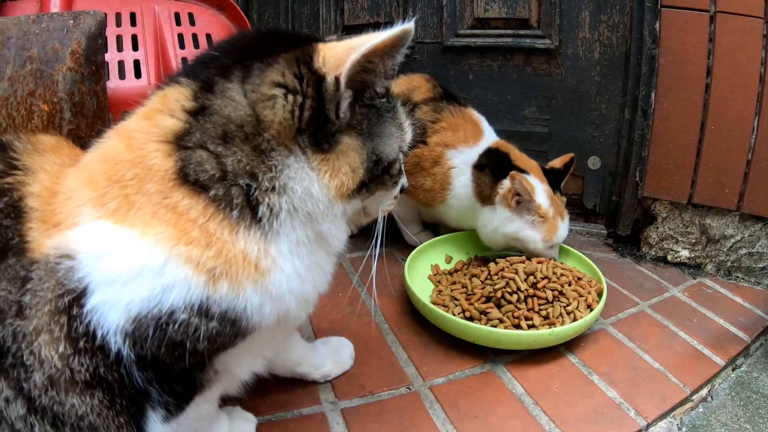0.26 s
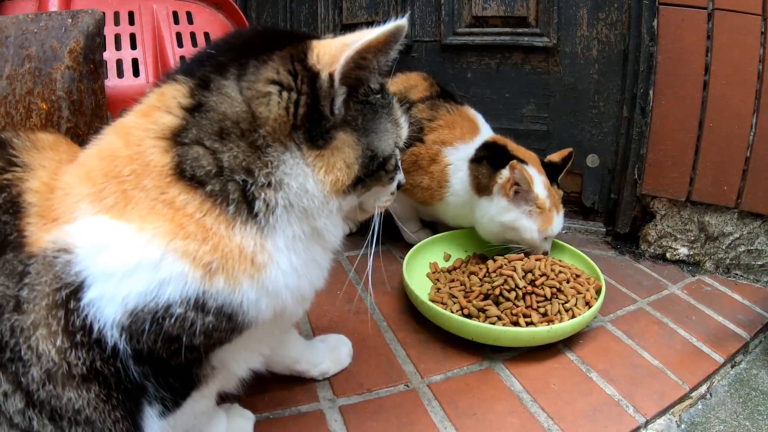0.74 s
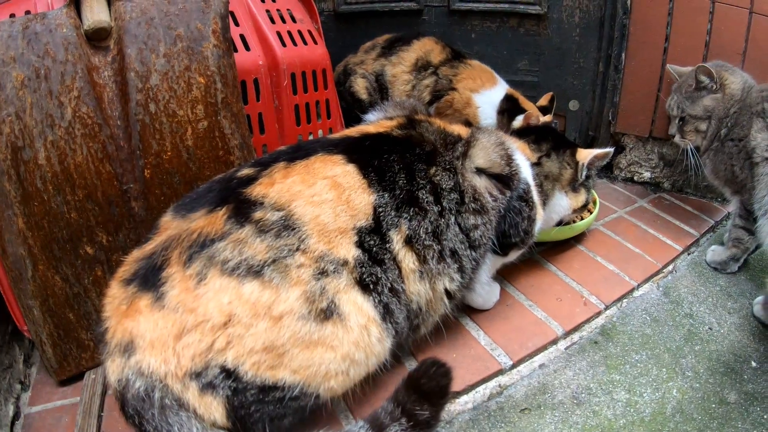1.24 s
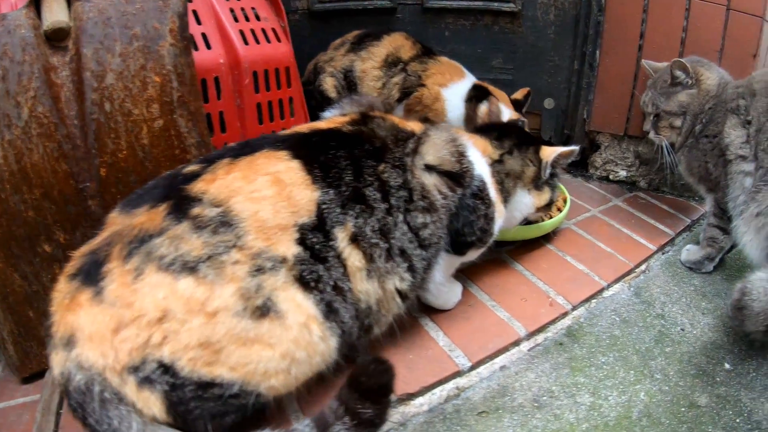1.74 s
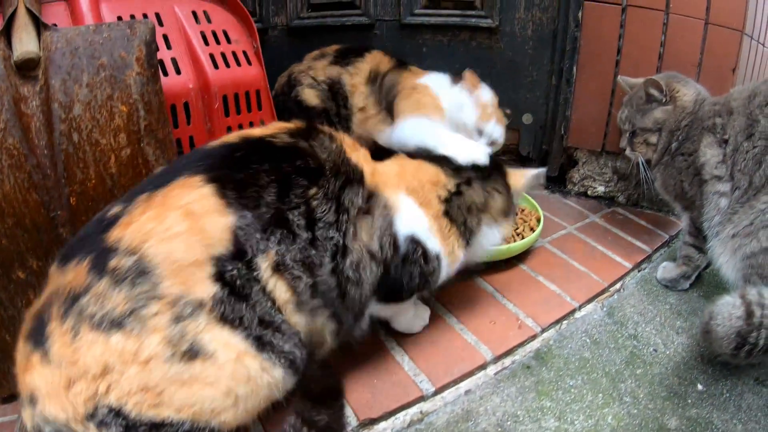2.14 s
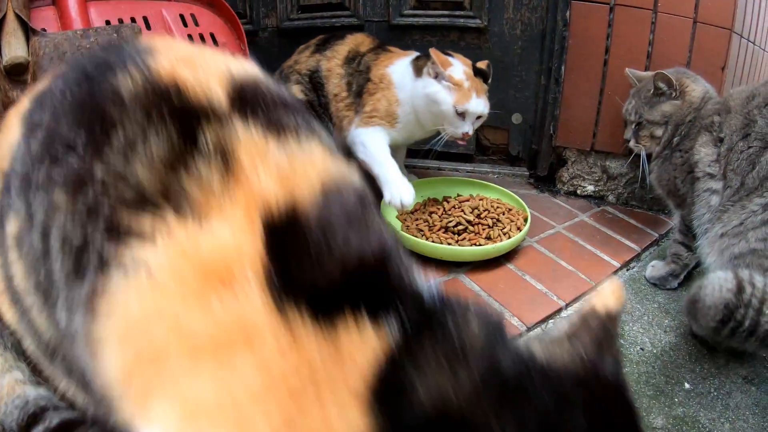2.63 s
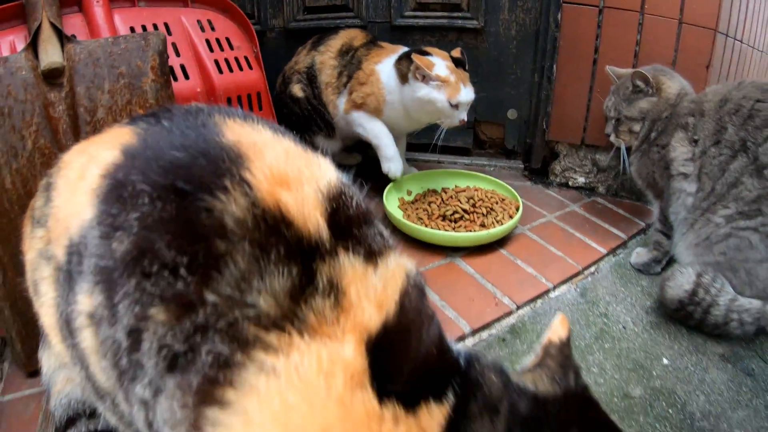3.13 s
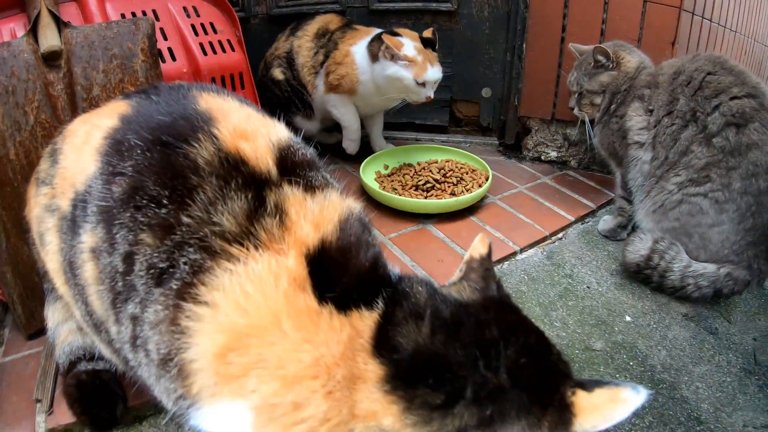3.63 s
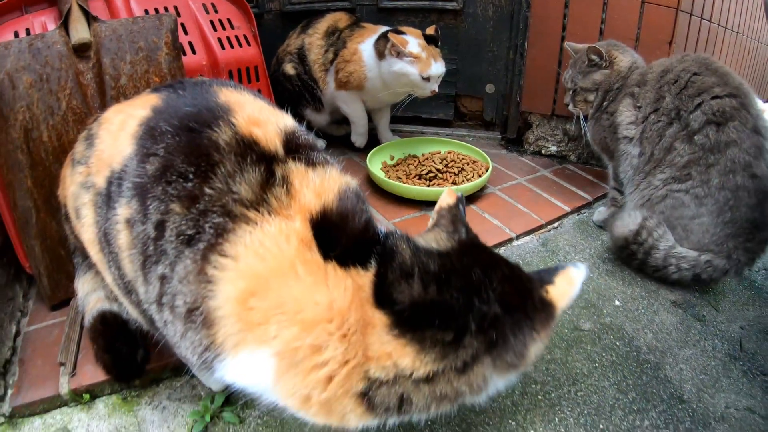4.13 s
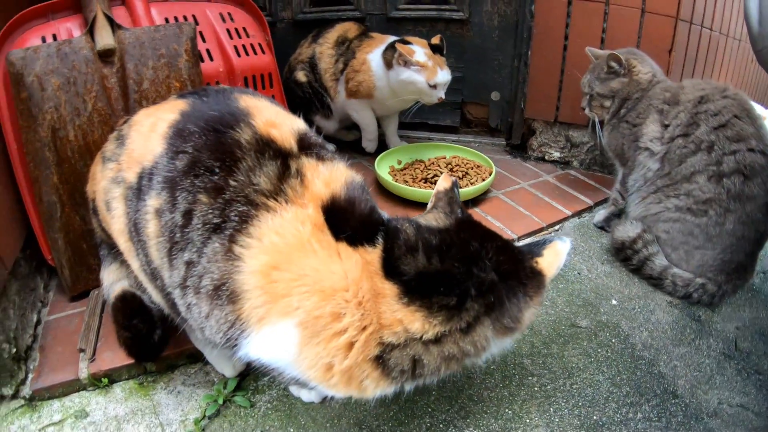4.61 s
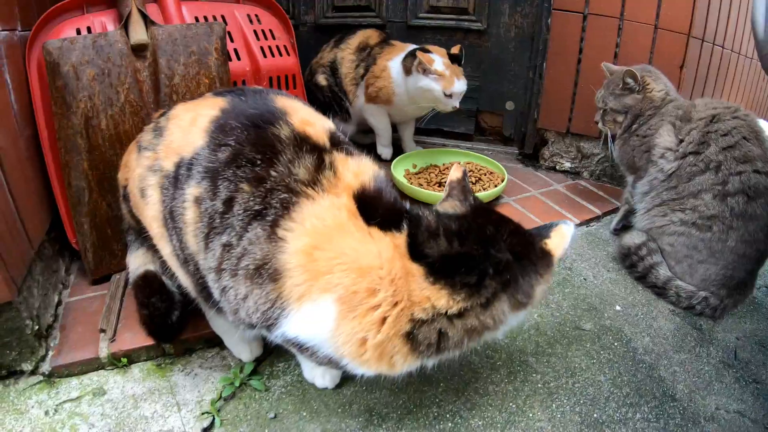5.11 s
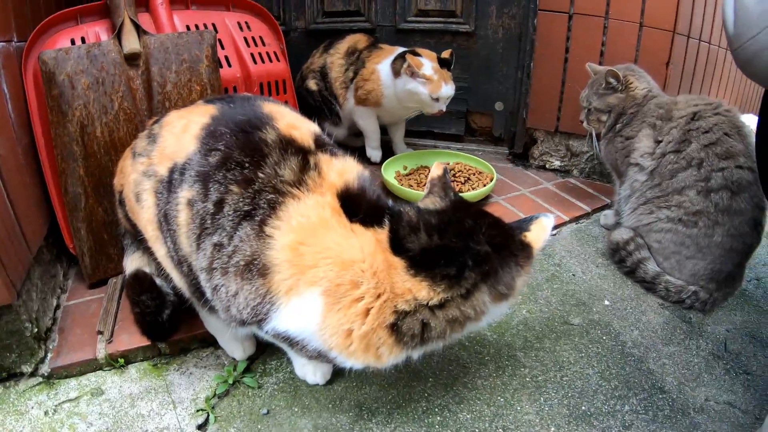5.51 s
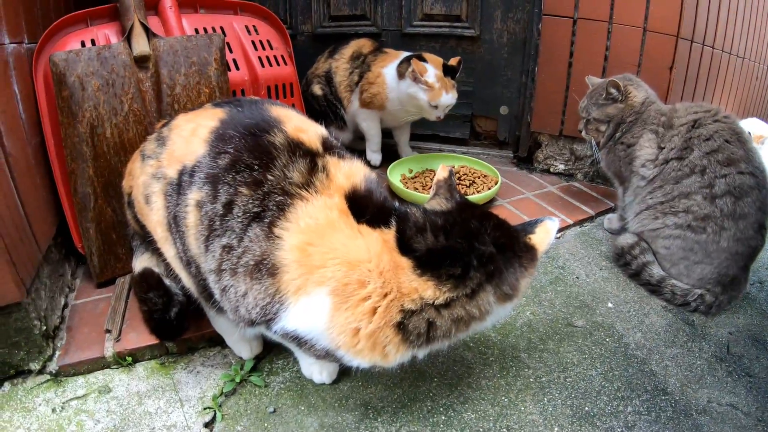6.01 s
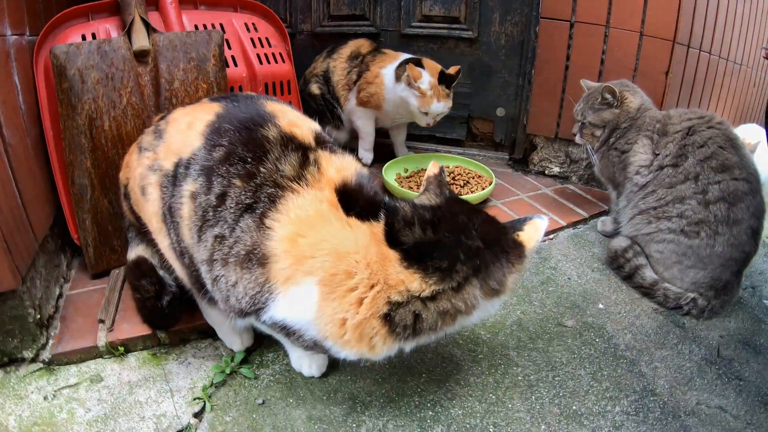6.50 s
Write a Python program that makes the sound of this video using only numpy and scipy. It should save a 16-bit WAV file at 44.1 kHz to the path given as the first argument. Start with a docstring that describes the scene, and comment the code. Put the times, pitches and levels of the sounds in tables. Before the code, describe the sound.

A quiet outdoor doorstep: light wind on the microphone, diffuse distant traffic and a low, far engine hum swelling now and then during the first two seconds. A small click comes at 0.9 s and a faint plastic bowl knock at 1.9 s. Wind swells at about 2.2 s. At 2.36 s a close, central cat spits: a very brief hollow puff, a sharp ringing pop, then a bright wet hiss that thins and stops by about 2.6 s, with quick hard-surface echoes. Fur and paws rustle, strongest near 2.85 s. Low bumps and wind thumps hit around 3.2-3.4 s, with grainy scuffs and ticks until 4.7 s. Gusts keep rumbling, shifting between sides; dull bumps come at 5.7-5.9 s. At 6.4 s the sound dips briefly, returning narrower with a sharp click, hand-rub scrape and a cluster of soft bumps to the end.

```python
"""A breeze with single gusts rumbles on the microphone over a far engine's hum and traffic wash.
At a food bowl on a tiled doorstep a cat spits: hollow puff, sharp pop, wet hiss that thins out.
The voice is noise in moving resonances plus a ringing pop; wind is level-driven low noise in each port.
Dull low bumps are sinking noise bands, a hand rubbing the camera is a scraping wash; ticks and clicks are
short noise bursts, paws and fur grainy noise. Near the end the sound dips briefly and returns narrower."""
import sys
import numpy as np
from scipy import signal
from scipy.fft import rfft, irfft
from scipy.io import wavfile
from scipy.ndimage import uniform_filter1d

SR = 44100
rng = np.random.default_rng(int(sys.argv[2]) if len(sys.argv) > 2 else 0)


def dump_mix(stems):
    """Bounce the given channels to the path in sys.argv[1] as a 16-bit WAV at rate SR."""
    frames = np.atleast_2d(stems).T  # one column per channel
    limited = np.clip(frames, -1, 1)  # hard clip at full scale
    pcm = np.round(limited * 32767).astype(np.int16)
    wavfile.write(sys.argv[1], SR, pcm)


N = 297675
T = np.arange(N) / SR
HZ = np.fft.rfftfreq(N, 1 / SR)
PUFF_S, PUFF_DB = 2.3555, -19  # the blast reaches its full level
OPEN_S = 2.369  # the mouth starts to open


def amp(db):
    """Decibels to gain."""
    return 10 ** (np.asarray(db) / 20)


def unit(x):
    """Scales to an rms of one."""
    return x / np.sqrt(np.mean(x ** 2) + 1e-20)


def over_hz(points):
    """Joins (hz, value) points on a log-frequency axis."""
    hz, value = np.transpose(points)
    return np.interp(np.log(HZ + 1), np.log(hz + 1), value)


def over_time(rows):
    """Joins (s, ..) rows: one curve for each further column."""
    s, *columns = np.transpose(rows)
    return [np.interp(T, s, column) for column in columns]


def tinted(gain):
    """Noise of rms one with the given gain at each frequency."""
    a, b = rng.standard_normal((2, len(HZ)))
    return unit(irfft((a + 1j * b) * gain, N))


def band(hz, centre_hz, width_hz):
    """Gain of a resonance with steep skirts; width at -3 dB."""
    return (1 + ((hz - centre_hz) / (1.15 * width_hz)) ** 2) ** -2


def ringing(hz, width_hz):
    """Noise in a resonance whose centre follows the curve hz."""
    a, b = (tinted(band(HZ, 0, width_hz)) for part in range(2))
    angle = 2 * np.pi * np.cumsum(hz) / SR
    return a * np.cos(angle) + b * np.sin(angle)


def wander(rate_hz):
    """Random drift of rms one, mostly slower than the given rate."""
    return tinted(np.exp(-(HZ / rate_hz) ** 2))


def steadied(x, seconds):
    """Evens out a noise's level, so that its driving force alone sets the loudness."""
    power = uniform_filter1d(x ** 2, max(int(seconds * SR), 2), axis=-1)
    return x / np.sqrt(abs(power) + 1e-9)


def panned(side_db):
    """Left and right gains of constant power; side_db is left minus right."""
    gains = amp(np.array([side_db, -side_db]).reshape(2, -1) / 2)
    return gains / np.sqrt(np.mean(gains ** 2, axis=0))


def both_ports(gain, likeness, side_db):
    """Diffuse sound: noise of one colour, partly alike left and right."""
    same = np.clip(likeness, 0, 1)
    shared = np.sqrt(same) * tinted(gain)
    separate = np.sqrt(1 - same) * np.array([tinted(gain), tinted(gain)])
    return panned(side_db) * (shared + separate)


def add(mix, s, sound):
    """Mixes a sound in at time s."""
    part = mix[round(s * SR):][:len(sound)]
    part += sound[:len(part)]


def bursts(rows, rise_s):
    """Each row is a burst of noise in one resonance that dies away."""
    out, t = np.zeros(N), np.arange(SR // 2) / SR
    hz = np.fft.rfftfreq(len(t), 1 / SR)
    for s, db, centre_hz, width_hz, t60_s in rows:
        spectrum = rfft(rng.standard_normal(len(t)))
        ring = irfft(spectrum * band(hz, centre_hz, width_hz), len(t))
        shape = (1 - np.exp(-t / rise_s)) * np.exp(-np.log(1000) * t / t60_s)
        add(out, s, amp(db) * unit(ring * shape) * np.sqrt(np.mean(shape ** 2)))
    return out


def struck(s, level_db, modes):
    """One blow at time s rings a set of decaying sine modes."""
    age = np.maximum(T - s, 0)
    out = np.zeros(N)
    for hz, db, t60_s in modes:
        decay = np.exp(-np.log(1000) * age / t60_s)
        out += amp(level_db + db) * decay * np.sin(2 * np.pi * hz * age)
    return out


def puff_db(hold_s=0.011, rise_db_per_s=1350, fall_db_per_s=2600):
    """Force of the blast behind the closed mouth: it swells, holds and collapses."""
    rise_db = rise_db_per_s * np.maximum(PUFF_S - T, 0)
    fall_db = fall_db_per_s * np.maximum(T - PUFF_S - hold_s, 0)
    return PUFF_DB - rise_db - fall_db


def puff(dull_db_per_s=200, faint_hiss_db=-31.5, faint_hiss_hz=3700, faint_hiss_width_hz=5600,
         faint_hiss_follow=.7):
    """A blast rings the throat, which sinks and dulls; a faint bright hiss rises and falls with it."""
    # throat resonances: start_hz, width_hz, relative_db, share of the sinking (0-1)
    throat_modes = [(710, 140, 2.5, 1), (980, 180, -3, .2), (1230, 120, -4, .1), (1490, 130, -7.5, .1),
                    (2200, 1000, -5.5, .3)]
    sink_share, sink_lead_s, sink_s = .16, .001, .013
    sink = sink_share * np.clip((T - PUFF_S + sink_lead_s) / sink_s, 0, 1)
    dull_db = dull_db_per_s * np.maximum(T - PUFF_S, 0)
    throat = np.zeros(N)
    for hz, width_hz, db, share in throat_modes:
        distance = abs(hz / throat_modes[0][0] - 1)  # far from the first resonance dulls faster
        ring = steadied(ringing(hz * (1 - share * sink), width_hz), 0.0034)
        throat += amp(db - distance * dull_db) * ring
    force_db = puff_db()
    faint_gain = amp(faint_hiss_db + faint_hiss_follow * (force_db - PUFF_DB))
    faint_hiss = faint_gain * tinted(band(HZ, faint_hiss_hz, faint_hiss_width_hz))
    return amp(force_db) * throat + faint_hiss


def pop():
    """The mouth pops open and its cavity rings."""
    # cavity modes: hz, relative_db, t60_s
    cavity = [(290, -0.5, .1), (430, -7.5, 0.044), (698.4, -2.5, .04)]
    return struck(2.3733, -14.5, cavity)


def cracks():
    """Short noise bursts as the mouth flies open."""
    # cracks of the spit: start_s, level_db, centre_hz, width_hz, t60_s
    crack_rows = [(2.3696, -19.5, 5790, 1963, 0.025), (2.37, -24, 9930, 9000, 0.029),
                  (2.3731, -16.5, 1300, 1200, .03), (2.3736, -25, 11060, 9075, .01),
                  (2.374, -23, 130, 298.7, 0.05)]
    return bursts(crack_rows, rise_s=0.00097)


def air_flow(opening_s=0.005, flow_db=-20, crest_after_s=0.047, sag_db=8, sag_s=0.1):
    """Once the mouth is open the flow arches and is cut off."""
    shut_after_s, shut_db_per_s = 0.19, 340
    age = T - OPEN_S
    arch_db = flow_db - sag_db * ((age - crest_after_s) / sag_s) ** 2
    shut_db = shut_db_per_s * np.maximum(age - shut_after_s, 0)
    return np.clip(age / opening_s, 0, 1) * amp(arch_db - shut_db)


def hiss(jet_db=-9, deep_db=-3, deep_loss_db=18, flutter_db=1.15, flutter_hz=130):
    """Turbulent air: resonances drop as the mouth opens, converge as it narrows; saliva flutters."""
    # open-mouth resonances: base_hz, width_hz, relative_db
    mouth_modes = [(1910, 460, -8), (2454, 310, -4.5), (3088, 460, 2.3), (4156, 830, 1.5), (5380, 630, -2),
                   (6220, 800, -5), (7600, 1300, -10.5), (9970, 1500, -16.5)]
    # air at the teeth: hz, relative db_per_hz
    jet_colour = [(300, -17), (1500, -4), (3000, 1.5), (6000, 1), (8500, -13), (11000, -15), (12300, -26),
                  (16000, -47)]
    # wide open throat: hz, relative db_per_hz
    deep_colour = [(90, -2.5), (160, -0.5), (300, -3.5), (480, -3), (700, 2), (1000, -1.5), (1300, -0.5),
                   (1900, -4.5), (3000, -19.5), (8000, -46)]
    narrowing_s, narrow_hz, narrow_pull = 0.17, 4033, .16
    slit_raise, slit_s = .8, .004  # the first slit raises the resonances by this share
    age = np.maximum(T - OPEN_S, 0)
    narrowing = np.minimum(age / narrowing_s, 1)
    slit = 1 + slit_raise * np.exp(-age / slit_s)
    mouth = np.zeros(N)
    for hz, width_hz, db in mouth_modes:
        pull = (narrow_hz / hz) ** (narrow_pull * narrowing)
        mouth += amp(db) * ringing(slit * hz * pull, width_hz)
    teeth = amp(jet_db) * tinted(amp(over_hz(jet_colour)))
    deep_noise = steadied(tinted(amp(over_hz(deep_colour))), 0.0091)
    throat = amp(deep_db - deep_loss_db * narrowing) * deep_noise
    flutter = amp(flutter_db * wander(flutter_hz))
    return air_flow() * flutter * (unit(mouth) + teeth + throat)


def spray(level_db=-9, per_s=420, spread_db=3.0, centre_hz=4500, width_hz=3000):
    """Tiny drops of saliva burst in the stream of air; level is relative to the flow."""
    hits = rng.random(N) < per_s / SR
    signs = rng.choice([-1, 1], N)
    drops = hits * signs * amp(spread_db * np.clip(rng.standard_normal(N), -2, 2))
    bursting = unit(irfft(rfft(drops) * band(HZ, centre_hz, width_hz), N))
    return amp(level_db) * air_flow() * bursting


def doorstep(x, echo_db=-13, tail_db=-24, t60_s=0.067):
    """The tiles, the door and the wall throw back a few quick echoes and a short tail."""
    t = np.arange(SR // 3) / SR
    response = rng.standard_normal(len(t)) * np.exp(-np.log(1000) * t / t60_s) * (t > .004)
    response *= amp(tail_db) / np.linalg.norm(response)
    response[0] = 1  # direct sound
    for delay_s, share in [(.0015, 0.11), (.00277, -0.29), (.0093, .6)]:
        response[round(delay_s * SR)] += share * amp(echo_db)
    return signal.fftconvolve(x, response)[:N]


def bumps(rise_s=0.0027, settle_s=0.01153, low_hz=65, width_hz=85):
    """Dull low bumps, one the low part of the click at 6.398 s: each pitch settles as it dies."""
    # start_s, level_db, starting pitch_hz, t60_s, left minus right_db
    bump_rows = [(3.232, -20.5, 150, 0.14, 12), (3.244, -22, 290, 0.087, 12), (3.296, -14.5, 150, .06, -2),
                 (5.707, -21, 105, 0.11, 10), (5.857, -16, 170, 0.094, 18), (6.398, -24, 210.6, 0.04, 10),
                 (6.421, -23, 350, 0.095, -1), (6.433, -21, 130, .06, 0), (6.487, -31, 310, 0.15, 3),
                 (6.502, -27.5, 280, .1, 0), (6.519, -25.5, 230, 0.065, 0),
                 (6.543, -17.5, 110, 0.072, -2.5), (6.575, -25.5, 210, 0.088, 3.5),
                 (6.612, -25.5, 170, 0.12, -0.5)]
    out = np.zeros((2, N))
    for s, db, start_hz, t60_s, side_db in bump_rows:
        age = np.clip(T - s, 0, 1)
        pitch_hz = low_hz + (start_hz - low_hz) * np.exp(-age / settle_s)
        ring = steadied(ringing(pitch_hz, width_hz), .012)
        shape = amp(db - 60 * age / t60_s) * (1 - np.exp(-age / rise_s))
        out += panned(side_db) * shape * ring
    return out


def rub(grain_db=1.8, grain_hz=120, rise_s=.002):
    """The hand slides on the camera: a fine scraping wash that rings the housing."""
    # slides: start_s, level_db, length_s
    slides = [(6.403, -48, 0.081), (6.472, -67, 0.64), (6.55, -64, 0.032), (6.578, -60, 0.019)]
    # housing resonances: hz, width_hz, relative_db
    housing_modes = [(1330, 110, 4), (3030, 100, 2), (4320, 390, -0.5), (3200, 3100, 1),
                     (8200, 4500, -16.5)]
    force = np.zeros(N)
    for s, db, length_s in slides:
        fall = np.clip(1 - (T - s) / length_s, 0, 1) ** 2
        force += amp(db) * np.clip((T - s) / rise_s, 0, 1) * fall
    colour = sum(amp(db) * band(HZ, hz, width_hz) for hz, width_hz, db in housing_modes)
    return force * amp(grain_db * wander(grain_hz)) * tinted(colour)


def knock():
    """The plastic bowl is nudged and its modes ring."""
    # bowl modes: hz, relative_db, t60_s
    bowl_modes = [(1050, -1, .03), (1465, 1.5, 0.042), (2060, -7, .03), (2270, -21, .03)]
    return struck(1.9367, -43.5, bowl_modes)


def ticks():
    """Small ticks, and sharp clicks at 0.878 and 6.399 s: short bursts, separate noise in each port."""
    # start_s, level_db, centre_hz, width_hz, t60_s
    tick_rows = [(.878, -45.5, 1500, 14000, 0.0039), (1.9365, -58, 5460, 3500, 0.023),
                 (2.1435, -52, 5940, 6000, .012), (2.223, -49.5, 3280, 3210, 0.052),
                 (3.493, -56.5, 5030, 1000, 0.02), (3.798, -51.5, 2380, 150, .06),
                 (3.8023, -44, 2960, 200, 0.021), (3.8024, -48, 3500, 695, 0.014),
                 (3.812, -51.5, 2140, 300, 0.021), (4.231, -52.5, 3020, 3050, 0.028),
                 (4.6562, -51, 7350, 5043, 0.015), (4.6638, -57, 7000, 5000, .015),
                 (5.642, -61, 3810, 3996, 0.043), (5.932, -50.5, 2374, 300, 0.014),
                 (5.9391, -53.5, 3320, 2600, .014), (6.3988, -33, 2040, 15970, .0045),
                 (6.3992, -29, 700, 1490, 0.0057)]
    return np.array([bursts(tick_rows, rise_s=0.00021) for port in range(2)])


def scuffs(grain_db=4.0, grain_hz=140, rise_s=.002):
    """Grainy scuffs: grit catches and slips under a paw until it comes to rest."""
    # start_s, level_db before grain, length_s, centre_hz, width_hz
    scuff_rows = [(3.352, -63.5, .06, 6800, 3010), (3.78, -65.5, .055, 6500, 2800),
                  (4.324, -70.5, 0.12, 4960, 2800)]
    out = np.zeros(N)
    for s, db, length_s, centre_hz, width_hz in scuff_rows:
        force = np.clip((T - s) / rise_s, 0, 1) * np.clip(1 - (T - s) / length_s, 0, 1) ** 2
        out += amp(db) * force * tinted(band(HZ, centre_hz, width_hz))
    return out * amp(grain_db * wander(grain_hz))


def rustle(grain_db=1.0, grain_hz=70):
    """Fur and paws brush the ground, most just after the spit."""
    # cats' movement: time_s, level_db before grain
    movement = [(0, -72), (.8, -74), (1.8, -73.5), (2.3, -65), (2.65, -61.5), (2.85, -55.5), (3.1, -64.5),
                (4.4, -71.5), (5, -76), (6.75, -76)]
    # brushing noise: hz, relative db_per_hz
    brush_colour = [(880, -36.5), (1500, -7), (1880, -4), (2080, -1.5), (2510, -2.5), (4820, -12.5),
                    (5450, -5), (6330, -6), (7990, -21), (9630, -19), (12100, -36), (14000, -41)]
    db, = over_time(movement)
    brushing = both_ports(amp(over_hz(brush_colour)), likeness=0.15, side_db=-5.5)
    return amp(db + grain_db * wander(grain_hz)) * brushing


def wind(level_db=3.5, lump_db=1.0, lump_hz=12, eddy_db=2.14, eddy_hz=220, eddy_follow=0.42,
         usual_db=-30.5, crest_share=0.3, thump_hz=138, thump_width_hz=100, housing_db=-12):
    """Eddies press on each port; small, brighter ones follow the breeze less; gusts thump the housing."""
    # wind noise: hz, relative db_per_hz
    rumble_colour = [(8.8, -34.5), (15, -3), (43, 4.5), (84, -0.5), (133, -7.5), (292, -38), (336, -29),
                     (601, -36), (679, -31), (755, -43.5), (810, -36.5), (900, -52), (1000, -49),
                     (1300, -79), (2200, -120)]
    # left-right likeness: hz, likeness (0-1)
    likeness_points = [(20, 0.17), (200, 0.02), (1000, 0.048)]
    # breeze: time_s, db before the wind gain level_db, left minus right_db
    breeze_rows = [(0, -45.5, -6), (.75, -43.5, -4.5), (1.15, -48.5, 0), (1.5, -39.5, -2),
                   (2.12, -42, -0.5), (2.25, -28, -7.5), (2.57, -32.5, -7), (2.66, -28.5, -5.5),
                   (3.1, -33, -4), (3.5, -27.5, -3.5), (4.1, -30, -6), (4.9, -30.5, -4),
                   (5.3, -33.5, -13.5), (5.8, -33, -0.5), (6.35, -30, -3.5), (6.75, -35, -1.5)]
    # gusts (large_db and small_db before the wind gain):
    # start_s, large_db, length_s, small_db, housing thump_db, left minus right_db
    gust_rows = [(0.052, -32.5, 0.15, -40, -66, -12), (0.87, -37.5, 0.047, -32, -59, -4),
                 (2.228, -28.5, 0.17, -28, -37.5, -21.5), (2.366, -18, 0.037, -28, -42, 19.5),
                 (2.816, -24.5, 0.084, -29, -36, -10), (3.205, -21.5, 0.08, -23.5, -26, 22.5),
                 (3.31, -26, 0.04, -28, -30.5, 1), (3.373, -23.5, 0.073, -22.5, -36.5, 3),
                 (3.818, -24.5, 0.14, -28, -45, -8.5), (4.375, -23.5, 0.077, -24, -41, -15),
                 (4.732, -22.5, 0.091, -25, -45, -17), (5.866, -23, 0.028, -25, -41, 10.5),
                 (6.084, -18.5, 0.038, -21.5, -42, -1), (6.357, -24, .03, -28, -37, -0.5)]
    colour, same = amp(over_hz(rumble_colour)), np.clip(over_hz(likeness_points), 0, 1)
    a, b = rfft(rng.standard_normal((2, N)))
    spectra = colour * np.array([a, same * a + np.sqrt(1 - same ** 2) * b])
    ports = steadied(irfft(spectra, N), 0.099)
    small = irfft(rfft(ports) * HZ ** 2 / (HZ ** 2 + eddy_hz ** 2), N)
    large = ports - small

    breeze_db, lean_db = over_time(breeze_rows)
    small_breeze_db = usual_db + eddy_follow * (breeze_db - usual_db)
    large_power = (panned(lean_db) * amp(breeze_db)) ** 2
    small_power = (panned(lean_db) * amp(small_breeze_db)) ** 2
    thump = amp(housing_db) * np.sqrt(small_power)
    for s, db, length_s, small_db, thump_db, side_db in gust_rows:
        age = np.clip((T - s) / (crest_share * length_s), 0, 20)
        gust = panned(side_db) * age * np.exp(1 - age)  # crests at age 1
        large_power += (amp(db) * gust) ** 2
        small_power += (amp(small_db) * gust) ** 2
        thump += amp(thump_db) * gust

    small_eddies = small * np.sqrt(small_power) * amp(eddy_db * wander(lump_hz))
    eddies = large * np.sqrt(large_power) + small_eddies
    thump_noise = both_ports(band(HZ, thump_hz, thump_width_hz), likeness=0.07, side_db=0)
    housing = steadied(thump_noise, 0.0067)
    lumps = unit(amp(lump_db * wander(lump_hz)))
    return amp(level_db) * lumps * eddies + thump * housing


def engine(pitch_hz=77.7, level_db=-43, waver=.012, waver_hz=2.46, throb_db=1, throb_hz=13.0):
    """A low far hum that swells now and then; its sine lines waver in pitch and level."""
    # swells: centre_s, level_db, length_s
    swells = [(0.921, -29.5, 0.041), (1.17, -38.5, 0.25), (1.569, -36, 0.09), (1.85, -32.5, 0.044),
              (2.2, -38.5, 0.15)]
    # lines: multiple of the pitch, relative_db
    lines = [(1, 1.5), (1.6, -15.5), (2.001, -13), (3.041, -19)]
    level = amp(level_db)
    for s, db, length_s in swells:
        level = level + amp(db) * np.exp(-((T - s) / length_s) ** 2)
    turns = np.cumsum(pitch_hz * (1 + waver * wander(waver_hz))) / SR
    hum = np.zeros(N)
    for multiple, db in lines:
        line_gain = amp(db + throb_db * wander(throb_hz))
        hum += line_gain * np.sin(2 * np.pi * (multiple * turns + rng.random()))
    return level * hum


def street():
    """The wash of distant traffic: diffuse noise that swells and recedes."""
    # traffic: time_s, level_db
    traffic = [(.4, -59.5), (1.1, -57.5), (4.3, -57.5), (5, -61), (6.2, -60.5), (6.5, -56)]
    # wash: hz, relative db_per_hz
    wash_colour = [(150, -34), (250, 0.5), (289, -4.5), (393, -7), (420, -12.5), (455, -6), (535, -13.5),
                   (682, -19), (716, -16.5), (870, -19), (1130, -12.5), (1610, -17), (3340, -32),
                   (5600, -37), (12000, -62), (15600, -92), (22000, -120)]
    db, = over_time(traffic)
    return amp(db) * both_ports(amp(over_hz(wash_colour)), likeness=0.46, side_db=-1)


def scene():
    """The spitting cat is straight ahead; ticks, rustle, street and wind spread across both ports."""
    spit = doorstep(puff() + pop() + cracks() + hiss() + spray())
    bumps_and_rub = bumps() + rub()
    small_sounds = knock() + ticks() + scuffs() + rustle()
    return spit + bumps_and_rub + small_sounds + wind() + engine() + street()


def record(dry, narrow_side_db=-16, fade_in_s=.004, edge_hz=15800):
    """Near the end the sound dips briefly and comes back narrow; then the band limit."""
    # brief dip: time_s, gain
    dip = [(6.381, 1), (6.386, 0.55), (6.398, .03), (6.399, 0.92)]
    mid = dry.mean(0)
    side = (dry[0] - dry[1]) / 2 * amp(narrow_side_db * (T > dip[-1][0]))
    gain = over_time(dip)[0] * np.minimum(T / fade_in_s, 1)
    heard = np.array([mid + side, mid - side]) * gain
    lowpass = signal.firwin(511, edge_hz, window=("kaiser", 9), fs=SR)
    return signal.oaconvolve(heard, lowpass[None], "same")


dry = scene()
out = record(dry)
dump_mix(out)
```